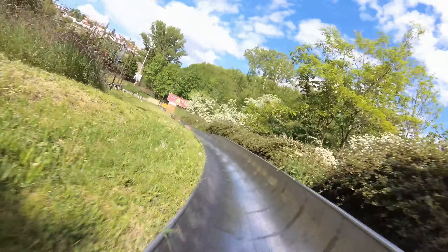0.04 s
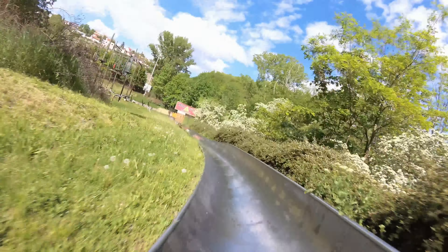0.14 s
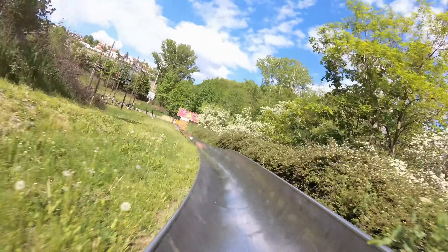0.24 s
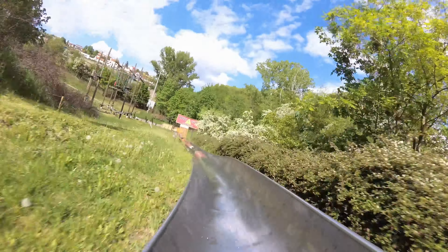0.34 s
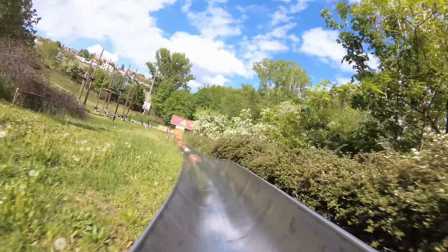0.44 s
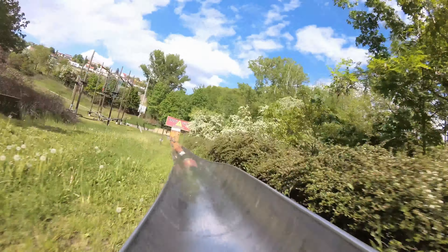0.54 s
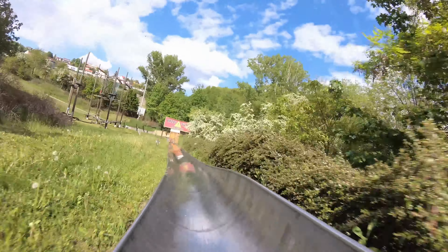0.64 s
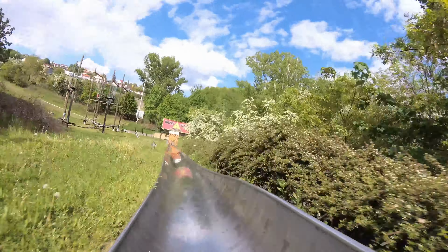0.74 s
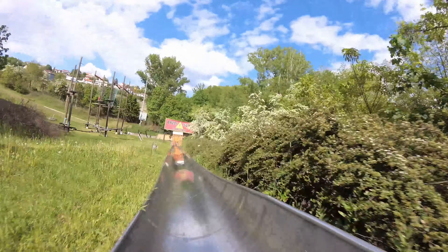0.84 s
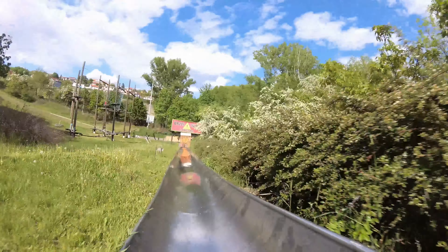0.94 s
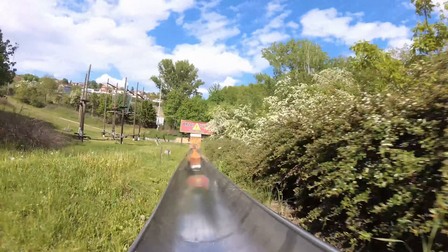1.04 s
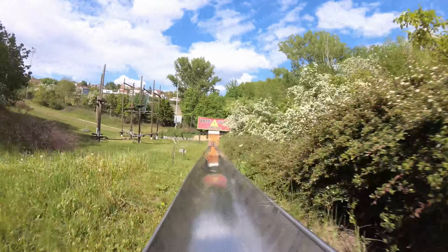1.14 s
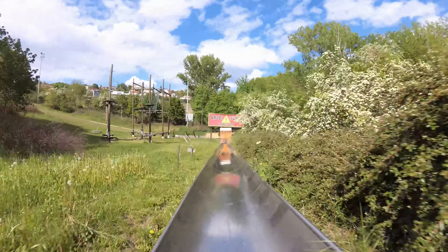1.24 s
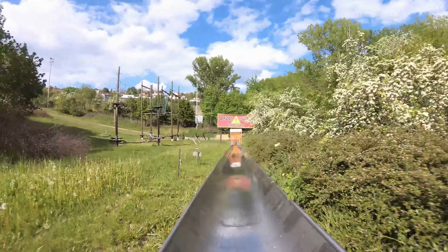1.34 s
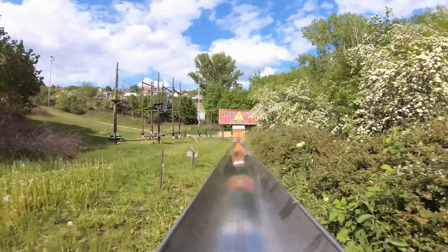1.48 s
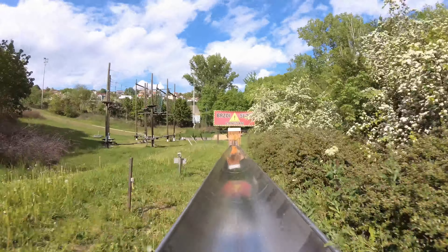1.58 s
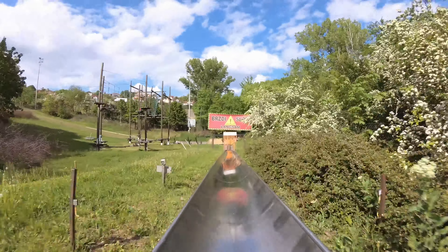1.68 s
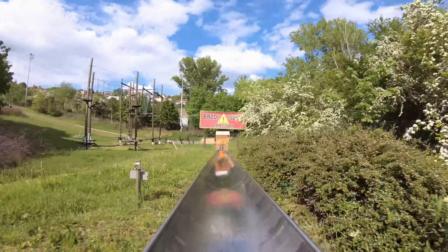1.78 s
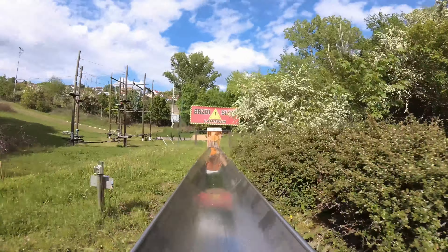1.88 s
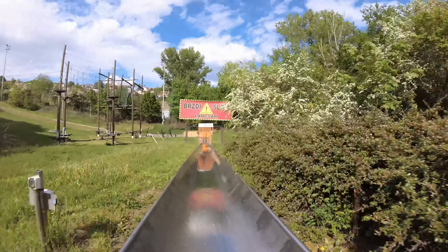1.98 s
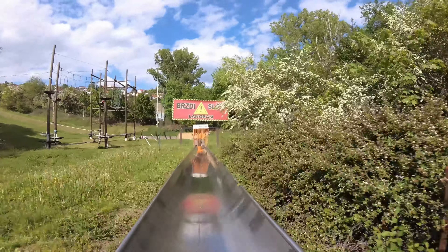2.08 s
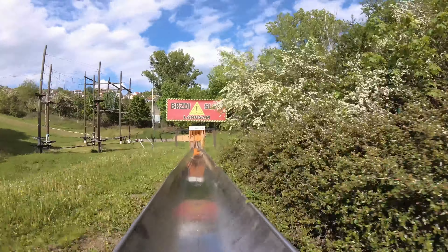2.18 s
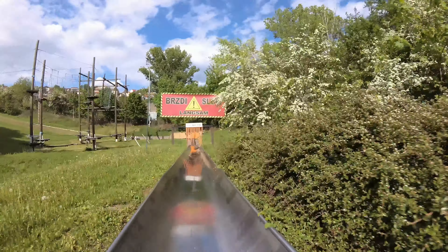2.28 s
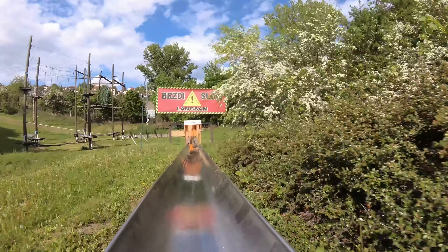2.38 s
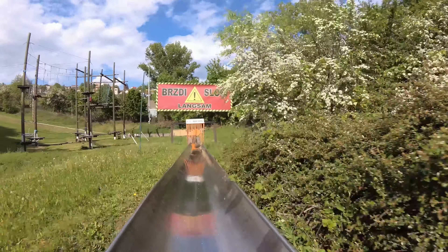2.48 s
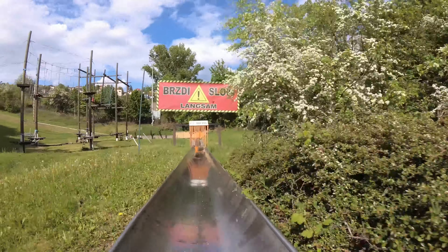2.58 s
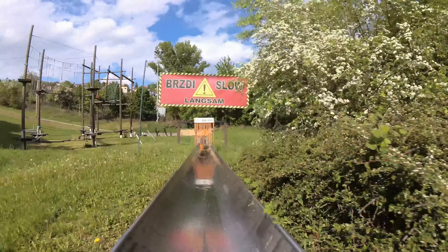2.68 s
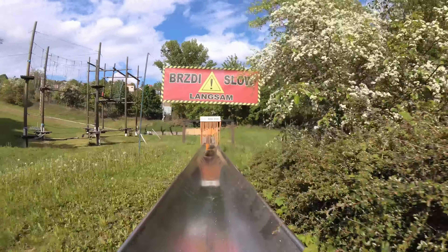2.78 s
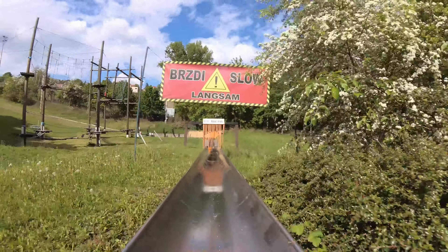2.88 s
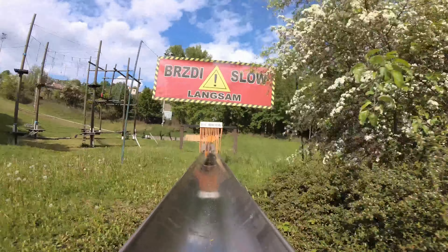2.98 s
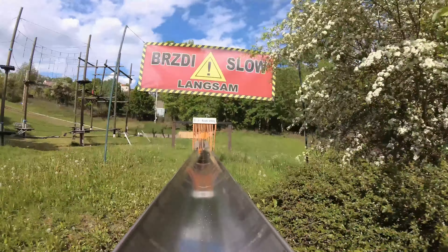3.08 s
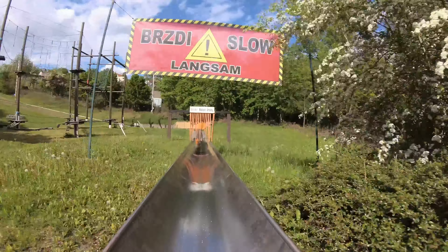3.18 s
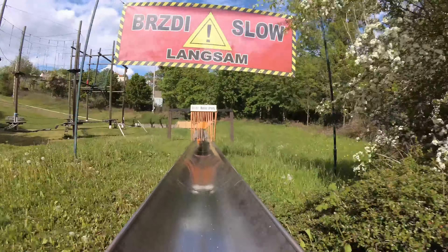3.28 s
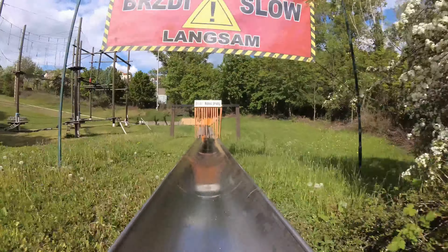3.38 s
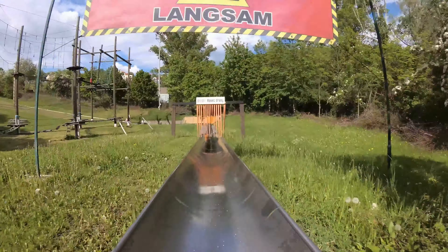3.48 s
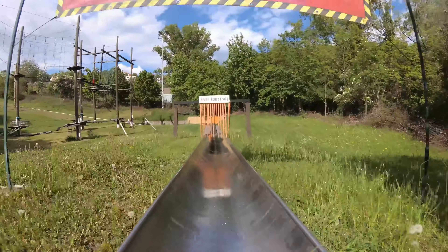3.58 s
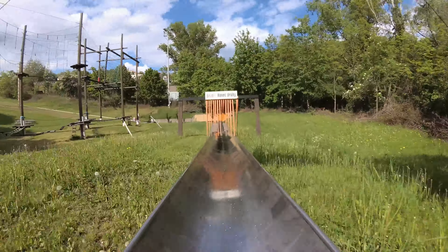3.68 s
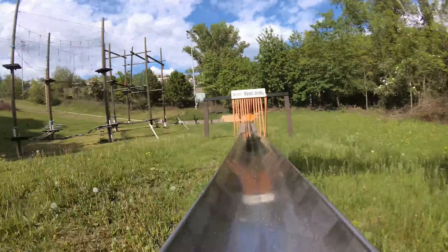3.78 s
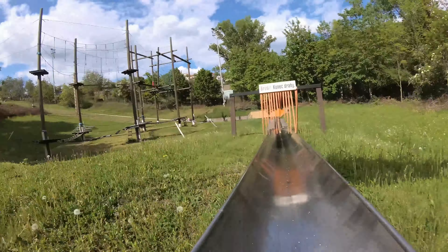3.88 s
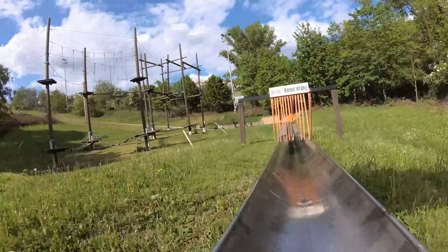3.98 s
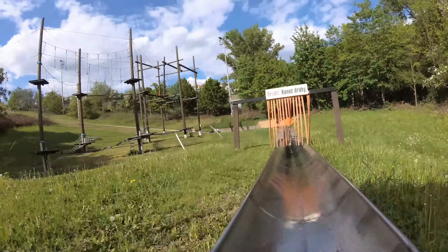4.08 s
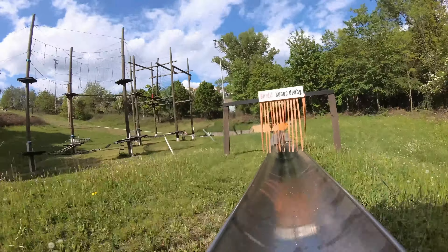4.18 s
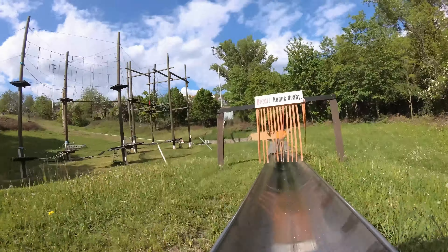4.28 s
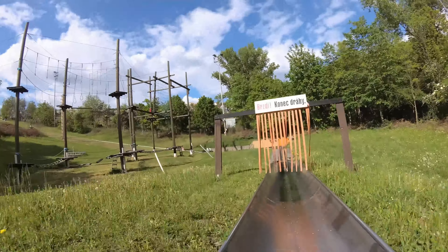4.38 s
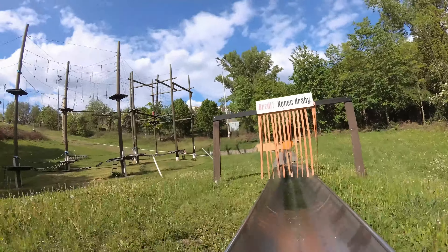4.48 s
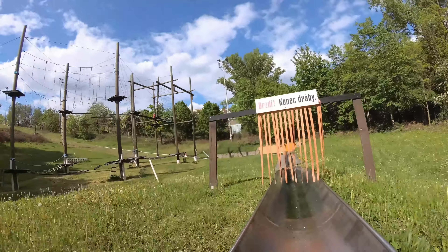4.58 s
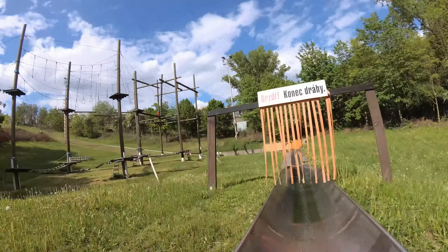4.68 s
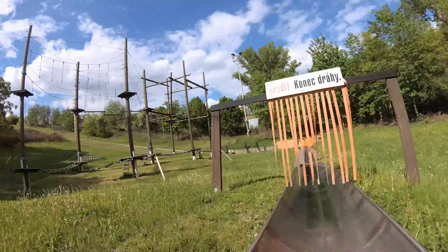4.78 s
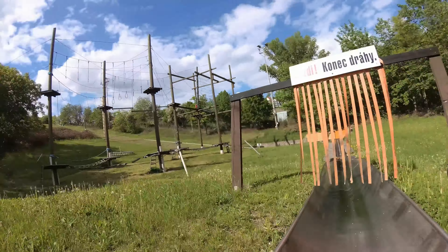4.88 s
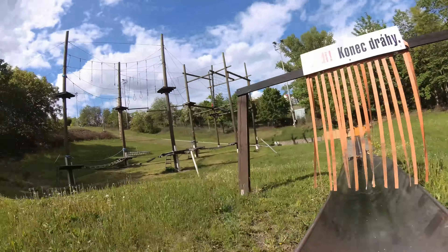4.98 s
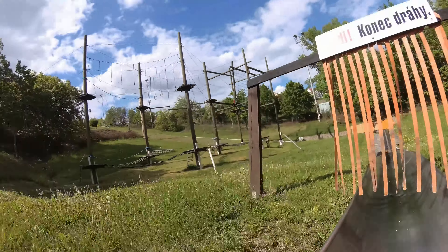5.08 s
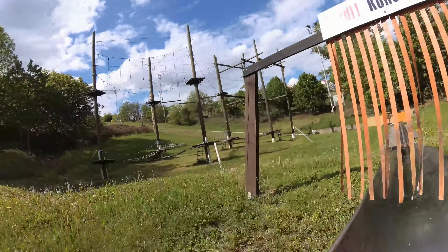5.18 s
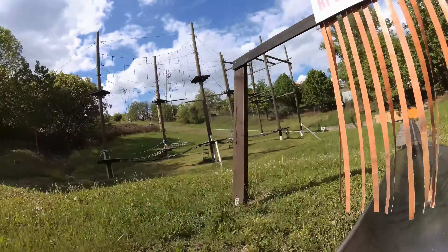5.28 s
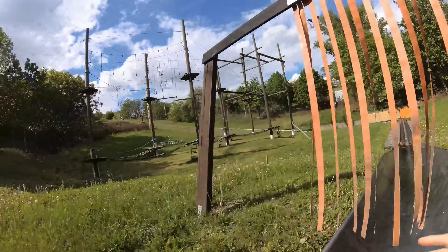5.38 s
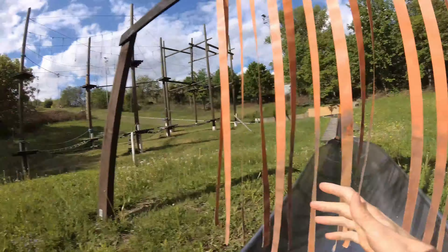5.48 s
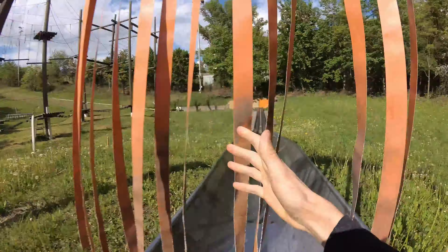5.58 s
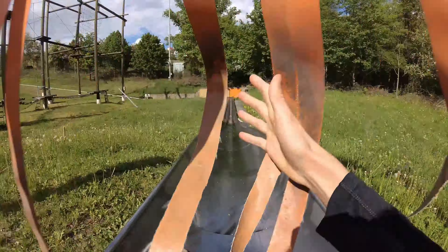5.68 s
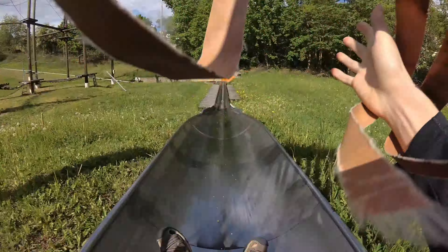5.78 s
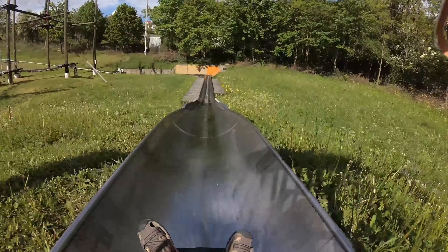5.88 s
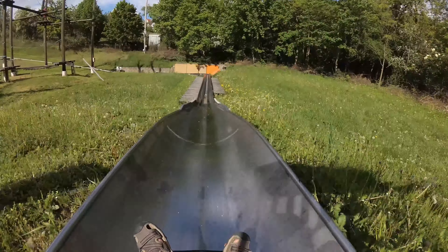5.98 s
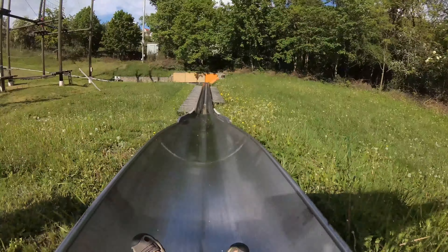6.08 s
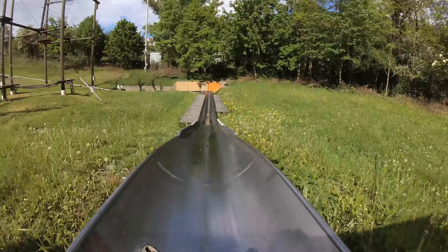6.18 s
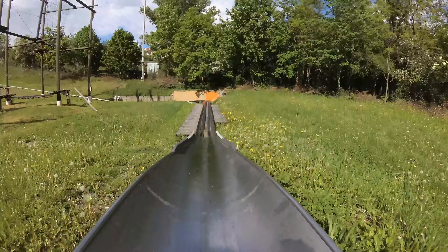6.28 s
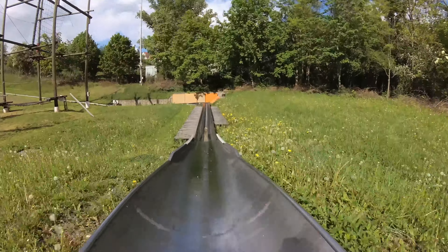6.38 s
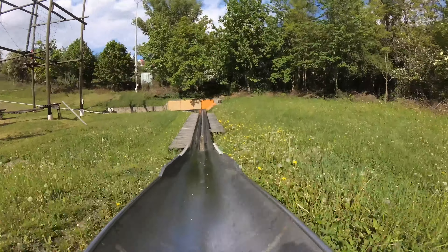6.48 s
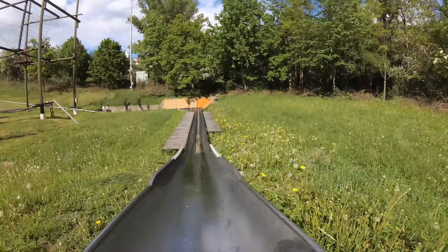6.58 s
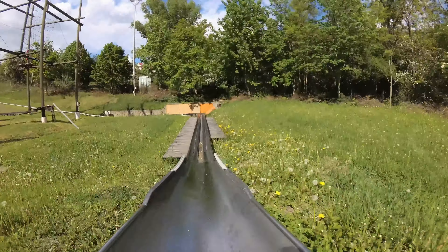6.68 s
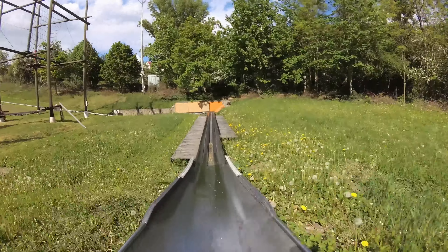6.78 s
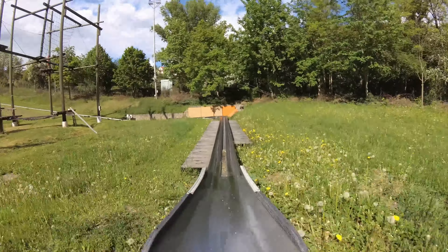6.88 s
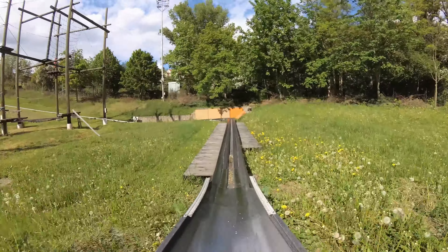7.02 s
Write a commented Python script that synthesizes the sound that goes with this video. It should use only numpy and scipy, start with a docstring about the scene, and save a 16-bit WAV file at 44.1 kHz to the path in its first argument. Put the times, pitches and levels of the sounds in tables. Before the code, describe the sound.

Close on-board microphone outdoors: a sled rumbles and rattles down a steel trough, loud at first with clustered jolts and low thuds. A very short high brake squeal comes about one second in, a hard metallic clack near three seconds. The rolling fades, distant bird notes show through, then a strap slaps the microphone housing loudly, followed by small knocks and near silence.

```python
"""Steel trough, outdoors: a wheeled sled runs down it and slows, heard by a camera on board.
Rolling noise and jolts at the trough's joints excite the resonances of the sled's parts.
Low rumble: wind that fades as the sled slows, plus low thuds as the sled lurches at jolts.
A stick-slip brake squeals once and single parts ring on; a bird whistles gliding tones.
A hanging strap slaps the camera housing and then damps its decaying modes."""
import sys
import numpy as np
from scipy import signal
from scipy.fft import rfft, irfft, next_fast_len
from scipy.io import wavfile
from scipy.ndimage import uniform_filter1d, map_coordinates

SR = 44100
rng = np.random.default_rng(int(sys.argv[2]) if len(sys.argv) > 2 else 0)


def persist_wave(psi):
    """Save psi, clipped to +-1, as 16-bit WAV."""
    counts = np.round(np.clip(psi, -1, 1) * 32767).astype(np.int16)
    wavfile.write(sys.argv[1], SR, np.atleast_2d(counts).T)


N = 310891
T = np.arange(N) / SR  # time [s]


def amp(db):
    """Decibel law: level in dB to amplitude ratio."""
    return 10 ** (np.asarray(db) / 20)


def unit(x):
    """Normalisation to unit root-mean-square."""
    return x / np.sqrt(np.mean(x ** 2) + 1e-20)


def curves(rows):
    """Linear interpolation: one value per sample for each column after the time."""
    s, *cols = np.transpose(rows)
    return [np.interp(T, s, c) for c in cols]


def wobble(rate):
    """Band-limited fluctuation: a smooth random curve with rate knots a second."""
    coarse = T[::16]
    knots = rng.standard_normal(int(N * rate / SR) + 4)
    return np.interp(T, coarse, map_coordinates(knots, [coarse * rate]))


def filtered(x, response):
    """Linear filtering: the spectrum of x times a complex response of frequency."""
    m = next_fast_len(N + SR // 2)
    return irfft(rfft(x, m) * response(np.fft.rfftfreq(m, 1 / SR)), m)[..., :N]


def ports(alike, opposite):
    """Sum and difference: left and right from what two microphone ports share and hear in opposition."""
    return np.array([alike + opposite, alike - opposite])


def resonance(modes):
    """Modal superposition: causal response (alike, opposite), scaled to unit mean power of alike."""
    def ring(f):
        total = 0
        for k, (centre, width, alike_db, opposite_db) in enumerate(modes):
            damping = 1j * f * width
            mode = damping / (centre * centre - f * f + damping)
            total = total + (-1) ** k * amp([[alike_db], [opposite_db]]) * mode
        return total
    scale = np.sqrt(np.mean(np.abs(ring(np.linspace(0, SR / 2, num=4096))[0]) ** 2))
    return lambda f: ring(f) / scale


def shaken(modes, force):
    """Forced vibration: the force rings a part's resonances."""
    return ports(*filtered(force, resonance(modes)))


def lumpy(lumpy_db, lumps):
    """Modulated noise: two noises whose strength fluctuates with lumps knots a second."""
    return unit(amp(lumpy_db * wobble(lumps)) * rng.standard_normal((2, N)))


def taps(lumpy_db, patchy_db):
    """Time-frequency modulation: lumpy noise that favours now one band, now another."""
    z = signal.stft(lumpy(lumpy_db, 350), nperseg=256)[2]
    field = rng.standard_normal(z.shape[1:])
    field = uniform_filter1d(field, size=3, axis=0)  # across frequency
    field = uniform_filter1d(field, size=8, axis=1)  # across time
    return unit(signal.istft(z * amp(patchy_db * unit(field)), nperseg=256)[1][:, :N])


def grit(rate, size_db):
    """Random impulses: single hard contacts, on average rate a second."""
    return amp(size_db) * (rng.random(N) < rate / SR) * rng.standard_normal((2, N))


# How hard rolling shakes the hull: (time [s], level [dB])
ROLLING = [(0.0, -17), (0.1, -20), (0.53, -24.5), (0.7, -23.5), (1.25, -25), (2.1, -29.5), (2.85, -30.5),
           (3.04, -27.5), (3.3, -31.5), (3.69, -32), (4.32, -33), (4.81, -35), (6.34, -35.5), (6.5, -36),
           (6.62, -31.5), (6.77, -37.5), (7.05, -40.5)]
# How each part follows the hull:
# part: (level at mid roll [dB], slope [dB per hull dB], floor added as power [dB])
PART_RESPONSE = {"pan": (-42, 1.31, -65), "frame": (-39, 1.26, -63), "fittings": (-54.5, 1.64, -58),
                 "axles": (-67, 2.52, -55.5), "air": (-56.5, 1.85, -57)}
MID_ROLL_DB = -30


def follows(part):
    """Power-law response: level in dB of what follows the rolling, power-summed with a floor."""
    mid_db, slope, least_db = PART_RESPONSE[part]
    driven_db = mid_db + slope * (curves(ROLLING)[0] - MID_ROLL_DB)
    return 10 * np.log10(amp(driven_db) ** 2 + amp(least_db) ** 2)


# Soft bumps under the floor pan: (time [s], push level [dB])
PAN_BUMPS = [(0.003, -33), (0.184, -42), (0.243, -33), (0.275, -35), (0.307, -35), (0.394, -42),
             (0.476, -35), (0.554, -39), (0.671, -46), (0.78, -52), (0.893, -49), (1.092, -40.5),
             (1.312, -35), (1.645, -36), (1.764, -45), (2.016, -43), (2.425, -36), (2.898, -35),
             (3.053, -42), (3.354, -41.5), (5.902, -43), (6.026, -35.5), (6.033, -49), (6.075, -50),
             (6.319, -43)]
PUSH_S = 0.0089


def thumping():
    """Short tone-burst excitation: each bump pushes the pan at its own pitch for about two cycles."""
    force = np.zeros(N + SR)
    t = np.arange(round(PUSH_S * SR)) / SR
    for (s, db), detune in zip(PAN_BUMPS, rng.standard_normal(len(PAN_BUMPS))):
        hz = 255 * (1 + 0.064 * detune)
        force[round(s * SR):][:len(t)] += amp(db) * np.sin(2 * np.pi * hz * t)
    return force[:N]


# Jolts: (time [s], frame rattle level [dB], hull re frame [dB], light parts re frame [dB],
# t60 before each part's linger factor [s])
JOLT_EVENTS = [(0.054, -26.5, 14, -2, .08), (0.064, -19.5, 10, -6, 0.085), (0.15, -30, 10, -27, 0.18),
               (0.178, -25.5, 1, -7, 0.033), (0.194, -22, 5, -4.5, 0.089), (0.334, -30, 4, -7.5, 0.24),
               (0.37, -38, -3, -2, 0.15), (0.399, -33.5, -10, 0, 0.1), (0.42, -38, -10, -1, 0.098),
               (0.477, -28.5, 5.5, -15, 0.25), (0.5566, -29.5, 6, -9.5, 0.11),
               (0.579, -30.5, 9.5, -12, 0.083), (0.672, -27.5, 9, -8, 0.059), (0.6765, -21, 1, -8, 0.027),
               (0.688, -27.5, 6, -6, 0.095), (0.7858, -31, 11, -7.5, 0.11), (0.797, -29, 8.5, -8, 0.13),
               (0.888, -31, 8.5, -10, 0.16), (0.924, -29.5, 10.5, -4, 0.079), (0.998, -28.5, -6, -11, 0.32),
               (1.19, -33.5, -5, -10, 0.14), (1.312, -28.5, 10, -9, .05), (1.3184, -21.5, 5.5, -10, 0.037),
               (1.332, -31.5, 11, -5.5, 0.079), (1.3979, -34, 13, -14, 0.37), (1.6592, -23, 7, -12, 0.05),
               (1.672, -28.5, 9, -11.5, 0.11), (1.767, -34, 12, -20, 0.11), (1.779, -33, 8.5, -24, 0.12),
               (2.034, -34.5, -1, -10.5, 0.082), (2.4348, -25, 8, -5, 0.066), (2.575, -40, 9, -22, 0.15),
               (2.6, -30, 7.5, -21, 0.076), (2.89, -35.5, 11, -10, 0.11), (2.899, -29, 3, -8, .07),
               (2.9042, -10, 3.5, -5.5, 0.038), (2.9172, -21.5, 15, -10, 0.071),
               (2.931, -22.5, 13, -7, 0.06), (2.955, -31.5, 15.5, -17, 0.11), (3.043, -26.5, 0, -16, 0.088),
               (3.0545, -16, 9.5, -9, 0.053), (3.068, -25, 5, 0.5, 0.1), (3.092, -26.5, 3.5, -8, .1),
               (3.1765, -26, 12, -2, 0.06), (3.196, -27, 2.5, -4.5, 0.079), (3.369, -33, 7, -11, 0.035),
               (3.395, -37, 0, -13, 0.037), (3.902, -34, 4, -9, 0.088), (3.9129, -18, 5, -7.5, 0.036),
               (3.93, -35.5, 13.5, -11, 0.11), (4.081, -44, 14, -23, 0.085), (4.109, -36.5, 11, -19, 0.21),
               (4.1735, -38.5, 8, -17, 0.32), (4.5156, -28, 11.5, -9, 0.043),
               (4.535, -37.5, 12, -9.5, 0.089), (4.7335, -34, 8, -13, 0.075), (4.753, -36, 12, -17, 0.07),
               (5.092, -39, 8, -29, .08), (5.108, -40, 5, -29, .06), (5.194, -35, 12.5, -6, 0.14),
               (5.451, -36, 9, -18, 0.06), (5.4665, -32.5, 12.5, -18, 0.046), (5.563, -41, 4, -30, 0.093),
               (5.6585, -32, -10, -19, 0.047), (5.676, -33.5, -17, -22, 0.06),
               (6.0073, -22.5, 12, 0.5, 0.035), (6.012, -25.5, 11.5, -15, 0.068),
               (6.0273, -19.5, 7.5, -9.5, 0.073), (6.044, -30, 11, -12.5, 0.18),
               (6.3048, -24, 5, -14, .045), (6.313, -29, 11, -9, 0.054), (6.319, -23, 8.5, -11, 0.067),
               (6.334, -21.5, 4, -6.5, 0.04), (6.341, -26.5, 12.5, -8, 0.057), (6.358, -31, 12, -18, 0.1),
               (6.387, -36, 14.5, -7, 0.066), (6.399, -38.5, 17.5, -11, 0.12),
               (6.491, -52.5, 23.5, -24, 0.13), (6.5829, -31, 8.5, -24, .03), (6.595, -29, 8, -14, 0.05),
               (6.667, -30, 6, -16, 0.055), (6.743, -35.5, 5.5, -8, 0.029), (6.7475, -29.5, 6, -7.5, 0.034),
               (6.779, -35, 8, -25, 0.04), (7.031, -46, 14, -22, .15)]
RATTLE_SHARE = 0.065  # share of its lingering t60 that a jolt rattles before it dies
AXLES_DB = -1  # axle rattle re the other light parts


def jolting(linger, blow_db, rise):
    """Impact and decay: a blow, a spell of rattling, then decay; lighter parts rise faster and linger longer."""
    power = np.zeros((4, N + SR))
    t = np.arange(SR // 3) / SR
    linger, blow_db, rise = np.array([linger, blow_db, rise])[..., None]
    blow = amp(blow_db - 60 * t / 0.012)
    for s, db, hull_db, light_db, t60 in JOLT_EVENTS:
        lasting = t60 * linger
        decay = amp(-60 * np.maximum(t - RATTLE_SHARE * lasting, 0) / lasting)
        rattle = (1 - np.exp(-t / rise)) * decay
        levels = amp(db + np.array([hull_db, 0, light_db, light_db + AXLES_DB]))
        power[:, round(s * SR):][:, :len(t)] += levels[:, None] ** 2 * (rattle ** 2 + blow ** 2)
    return np.sqrt(power[:, :N])


# First contact of a jolt, over its listed level: level [dB] of hull, frame, fittings, axles
CONTACT_DB = [20.95, 16.2, 13.4, 6.9]
HARD_T60_S, HARDER_DB = .06, 4  # a jolt of half the t60 starts this much harder


def clicks():
    """Impulse excitation: one sharp push on each part as a jolt starts, harder for short jolts."""
    force = np.zeros((4, N))
    for s, db, hull_db, light_db, t60 in JOLT_EVENTS:
        hard_db = HARDER_DB * np.log2(HARD_T60_S / t60)
        part_db = np.array([hull_db, 0, light_db, light_db])
        force[:, round(s * SR)] = amp(db + hard_db + part_db + CONTACT_DB)
    return force


# Resonances of the sled's parts; levels are relative within a part:
# (frequency [Hz], width [Hz], level alike at both ports [dB], level opposite at the ports [dB])
PAN_MODES = [(148, 103, -12, -47), (216, 52, -6, -54), (270.6, 35.6, 0.5, -51)]
HULL_MODES = [(362, 70, 0.5, -32), (563, 100, 1, -18.5), (666, 108, 0.5, -23), (871, 78.4, 3, -15.5),
              (1087, 107, -5, -30)]
WALL_MODES = [(1287, 173, 0.38, -9), (1628, 173, -1.3, -6)]
FRAME_MODES = [(1957, 343, 13, 10), (2600, 550, 3.5, 6), (2820, 190, -5.5, -20), (3345, 461, 14, 12),
               (3709, 476, 14.5, 13), (4850, 310, 5, 5)]
FITTINGS_MODES = [(5180, 1140, -3.5, -1.5), (7020, 800, -7.5, 5.5), (7000, 1440, -55, -0.5)]
AXLE_MODES = [(9610, 1110, -0.5, 2.5), (10290, 910, 1.5, -6), (12240, 2600, -5, -9.5),
              (14840, 1240, -2.5, -10)]


def sled():
    """Modal excitation: bumps shake all parts together, jolts add taps; the walls join hull and frame."""
    hull_db, = curves(ROLLING)
    pan_db, frame_db, fittings_db, axles_db = map(follows, ["pan", "frame", "fittings", "axles"])
    walls_db = (hull_db + frame_db) / 2 - 4.5
    bumps = 1.94 * wobble(16) + 0.24 * wobble(45)  # [dB]
    hull, frame, fittings, axles = jolting(linger=[.9, 1.2, 1.3, 1.9], blow_db=[2.5, -1.0, 4.0, -1],
                                           rise=[0.0051, 0.0016, 0.00076, 0.00057])
    click = clicks()

    pan_force = amp(pan_db + bumps) * lumpy(4.9, 30) + thumping()

    hull_force = amp(hull_db + bumps) * taps(1.6, patchy_db=.9)
    hull_force += hull * (taps(3.0, patchy_db=1.5) + grit(250, 17.7)) + click[0]

    walls_force = amp(walls_db + bumps) * lumpy(0.78, 200)
    walls_force += amp(-2.0) * np.sqrt(hull * frame) * lumpy(2.9, 350)

    frame_force = amp(frame_db + 0.49 * bumps) * (taps(0.74, patchy_db=1.66) + grit(120, 14.2))
    frame_force += frame * (taps(2.2, patchy_db=2.5) + grit(500, 14.8)) + click[1]

    fittings_force = amp(fittings_db + 0.57 * bumps) * lumpy(2.0, 300)
    fittings_force += fittings * (taps(1.3, patchy_db=1.0) + grit(500, 16.2)) + click[2]

    axles_force = amp(axles_db + 0.15 * bumps) * lumpy(0.86, 250)
    axles_force += axles * lumpy(2.2, 390) + click[3]

    return (shaken(PAN_MODES, pan_force) + shaken(HULL_MODES, hull_force)
            + shaken(WALL_MODES, walls_force) + shaken(FRAME_MODES, frame_force)
            + shaken(FITTINGS_MODES, fittings_force) + shaken(AXLE_MODES, axles_force))


# Narrow bands the camera mount swallows: (frequency [Hz], width [Hz], share lost [0-1])
MOUNT_NOTCHES = [(982, 83, 0.7), (1272, 34, 0.24), (1840, 140, 0.32), (4300, 380, 0.3)]


def mount(x):
    """Resonant absorption: what the sled passes on through the camera mount."""
    def passed(f):
        response = 1
        for centre, width, lost in MOUNT_NOTCHES:
            damping = 1j * f * width
            response = response * (1 - lost * damping / (centre * centre - f * f + damping))
        return response
    return filtered(x, passed)


# Low thuds as the sled lurches at jolts: (time [s], level before rise and decay [dB])
LURCH_EVENTS = [(0.025, -25), (0.514, -37), (0.669, -35), (0.776, -38), (0.896, -32), (1.442, -37),
                (1.778, -36), (2.169, -43), (2.597, -44), (2.885, -40), (3.051, -32), (3.528, -51),
                (3.892, -39), (4.122, -34), (4.513, -40), (4.761, -34), (5.226, -45), (5.458, -43),
                (5.899, -31), (6.312, -36.5), (6.646, -42), (6.778, -49)]
LURCH_RISE_S, LURCH_T60_S = 0.012, 0.49


def lurching():
    """Impulsive excitation with exponential decay: power of the low thuds as the sled lurches at jolts."""
    power = np.zeros(N)
    for s, lurch_db in LURCH_EVENTS:
        start = round(s * SR)
        t = T[start:][:SR // 2] - start / SR
        thud = (1 - np.exp(-t / LURCH_RISE_S)) * amp(lurch_db - 60 * t / LURCH_T60_S)
        power[start:][:SR // 2] += thud ** 2
    return power


# Spectrum shared by wind and thuds, relative: (frequency [Hz], level per hertz [dB])
RUMBLE_SPECTRUM = [(12, -38), (20, 7.5), (42, 10.5), (75, -4), (113, -8), (150, -30), (200, -39),
                   (330, -120)]


def low_rumble():
    """Power summation: wind that fades as the sled slows, plus lurch thuds, nearly alike at both ports."""
    f, db = np.transpose(RUMBLE_SPECTRUM)
    spectrum = lambda hz: amp(np.interp(np.log(hz + 1), np.log(f + 1), db))
    noise = filtered(rng.standard_normal((2, N)), spectrum)
    wind_power = amp(follows("air") + 2.5 * wobble(3.97)) ** 2
    level = np.sqrt(wind_power + lurching())
    alike, opposite = level * unit(amp(1.8 * wobble(17)) * noise)
    return ports(alike, amp(-19) * opposite)


# Brake squeal: (time [s], frequency [Hz], level [dB])
SQUEAL_GLIDE = [(1.018, 3300, -45), (1.028, 3340, -21), (1.031, 3325, -5.5), (1.036, 3310, -8.5),
                (1.046, 3315, -4.5), (1.051, 3330, -6.5), (1.056, 3350, -2), (1.063, 3360, -4.5),
                (1.068, 3420, -15), (1.0705, 3480, -10), (1.074, 3530, -25), (1.082, 3560, -50)]
# Overtones of the squeal: (multiple of the fundamental [1], level re fundamental [dB])
SQUEAL_PARTIALS = [(2, -29)]


def brake():
    """Stick-slip oscillation: a short gliding squeal; a weaker neighbouring mode beats with it."""
    hz, db = curves(SQUEAL_GLIDE)
    on = (T > SQUEAL_GLIDE[0][0]) & (T < SQUEAL_GLIDE[-1][0])
    phase = 2 * np.pi * np.cumsum(hz + 25 * wobble(300)) / SR
    tone = np.sin(phase) + amp(-15) * np.sin(1.08 * phase)
    for multiple, partial_db in SQUEAL_PARTIALS:
        tone += amp(partial_db + 4.2 * wobble(250)) * np.sin(multiple * phase)
    level = np.sqrt(2) * on * amp(db + 1.2 * wobble(200))
    return ports(level * tone, amp(-9.5) * level * np.cos(phase))


# A side panel, the brake shoe and frame tubes, set ringing:
# ((frequency [Hz], width [Hz], opposite re alike [dB]), start [s], level [dB], hold [s], then t60 [s])
RINGING_PARTS = [((1585, 120, -12), 2.915, -21, 0.07, 0.12), ((3480, 480, -2), 1.066, -19, 0.03, 0.24),
                 ((1600, 110, -12), 3.013, -26, 0.025, 0.09), ((4770, 320, -3), 6.042, -28, 0.012, 0.08),
                 ((3420, 370, -5), 6.332, -16.5, 0.008, 0.064), ((1800, 100, -5),
                 3.055, -19.5, 0.0036, 0.033), ((2060, 150, -3), 3.177, -26, .008, 0.056)]
ROUGH_HZ = 400  # a ringing this wide is all chatter; narrower ones keep part of an even tone


def ringing():
    """Narrow-band resonance: single modes chatter on as noise about their pitch, held and then decaying."""
    out = np.zeros((2, N + SR))
    t, f = np.arange(SR // 2) / SR, np.fft.rfftfreq(SR // 2, 1 / SR)
    for (hz, width, opposite_db), start, db, lasts, t60 in RINGING_PARTS:
        offset = (f - hz) / width
        band = np.exp(-offset ** 2) / np.hypot(1, 2 * offset)
        noise = rng.standard_normal((2, len(t)))
        alike, opposite = unit(irfft(rfft(noise) * band, len(t)))
        steady = max(1 - width / ROUGH_HZ, 0)  # share of power in the even tone
        alike = np.sqrt(1 - steady) * alike + np.sqrt(2 * steady) * np.sin(2 * np.pi * hz * t)
        decay = amp(db - 60 * np.maximum(t - lasts, 0) / t60)
        out[:, round(start * SR):][:, :len(t)] += decay * ports(alike, amp(opposite_db) * opposite)
    return out[:, :N]


# Whistled notes: (start [s], end [s], start frequency [Hz], end frequency [Hz], level [dB])
BIRD_NOTES = [(3.773, 3.795, 5100, 5050, -47), (4.59, 4.63, 2880, 3120, -50),
              (4.625, 4.655, 3120, 3100, -47), (4.845, 4.885, 3050, 3380, -48),
              (4.88, 4.925, 3410, 3370, -45), (4.925, 5.01, 2400, 2950, -50),
              (5.005, 5.045, 3000, 3370, -46), (5.04, 5.068, 3320, 2980, -46),
              (5.062, 5.09, 3250, 3600, -48), (5.09, 5.12, 2500, 2400, -49),
              (5.362, 5.436, 4740, 4740, -46.5), (5.575, 5.665, 2480, 2850, -49.5)]
WAVER_HZ, FLUTTER_DB = 25, 1.8  # random spread of pitch and of level


def bird():
    """Frequency modulation: far wavering, gliding whistles, a little to one side."""
    song = np.zeros(N)
    waver = 2 * np.pi * np.cumsum(WAVER_HZ * wobble(70)) / SR
    flutter_db = FLUTTER_DB * wobble(90)
    for start, end, from_hz, to_hz, db in BIRD_NOTES:
        on = slice(round(start * SR), round(end * SR))
        u = np.clip((T[on] - start) / (end - start), 0, 1)  # progress through the note
        cycles = (end - start) * (from_hz * u + (to_hz - from_hz) * u ** 2 / 2)
        swell = np.sqrt(np.abs(np.sin(np.pi * u)))
        song[on] += amp(db + flutter_db[on]) * swell * np.sin(2 * np.pi * cycles + waver[on])
    return ports(song, 0.61 * song)


# Strap on the camera housing: (time [s], level [dB])
STRAP_SLAP = (5.9013, 1.1)
# Housing modes before the strap damps them: (frequency [Hz], level re slap [dB], t60 [s])
HOUSING_MODES = [(141, -12, 0.049), (583, 5.5, 0.037), (751, -2, 0.043), (918, -4, 0.1), (430, -6, 0.05),
                 (1100, -5, 0.04), (1323, -0.5, 0.027), (2870, -24, 0.055)]
# The lid mode, which rings on: (frequency [Hz], level re slap [dB], t60 before damping [s])
LID_MODE = (856, -12.5, 0.5)
DAMPED_S, LID_DAMPED_S = 0.017, 0.034  # after the slap


def strap():
    """Damped free vibration: a slap rings the housing, thuds and scrapes; the strap then damps it, lid last."""
    slap_s, slap_db = STRAP_SLAP
    t = np.maximum(T - slap_s, 0)
    struck = t > 0

    def mode(hz, db, t60):
        """Exponential decay of one sinusoidal mode."""
        return amp(db - 60 * t / t60) * np.sin(2 * np.pi * hz * t)

    housing = sum(mode(*m) for m in HOUSING_MODES) * amp(-60 * np.maximum(t - DAMPED_S, 0) / 0.0065)
    lid = mode(*LID_MODE) * amp(1.7 * wobble(149.8)) * (1 - np.exp(-t / 0.008))
    lid *= amp(-60 * np.maximum(t - LID_DAMPED_S, 0) / 0.022)
    ring = (housing + lid) * amp(slap_db) * (1 - np.exp(-t / 0.0015))
    thud = struck * amp(slap_db - 5 - 60 * np.maximum(t - .013, 0) / 0.011)
    scrape = struck * amp(slap_db - 28 - 5.2 * ((t - .008) / 0.0048) ** 2)
    crack = struck * amp(slap_db - 33 - 60 * t / 0.0058)
    return (ports(ring, amp(-16) * ring)
            + shaken(HULL_MODES, thud * lumpy(1.8, 380))
            + shaken(FRAME_MODES, scrape * lumpy(2.5, 350))
            + shaken(FITTINGS_MODES, (amp(-14) * scrape + crack) * lumpy(2.5, 350)))


def scene():
    """Superposition of all sources, the left port slightly louder than the right."""
    sources = mount(sled()) + low_rumble() + brake() + ringing() + bird() + strap()
    return sources * amp([[.3], [-.3]])


CLIP_AT, TOP_HZ = .99, 15450  # amplitude limit, band limit


def record(dry):
    """Saturation and band limiting: the loudest peaks clip, then nothing passes above the band limit."""
    clipped = dry / (1 + np.abs(dry / CLIP_AT) ** 12) ** (1 / 12)
    return filtered(clipped, lambda hz: hz < TOP_HZ)


dry = scene()
out = record(dry)
persist_wave(out)
```